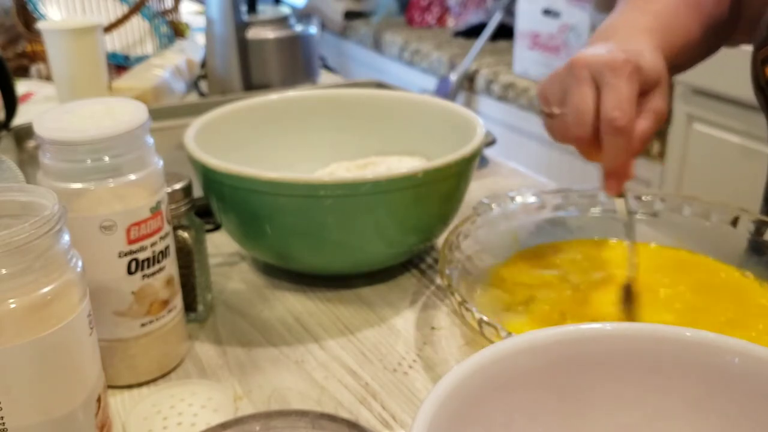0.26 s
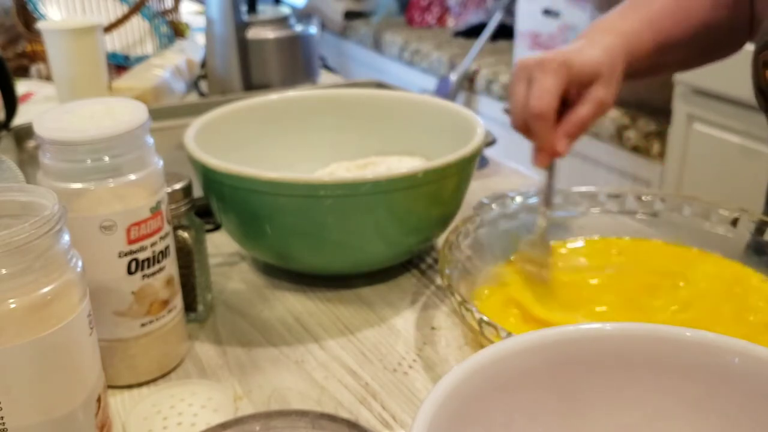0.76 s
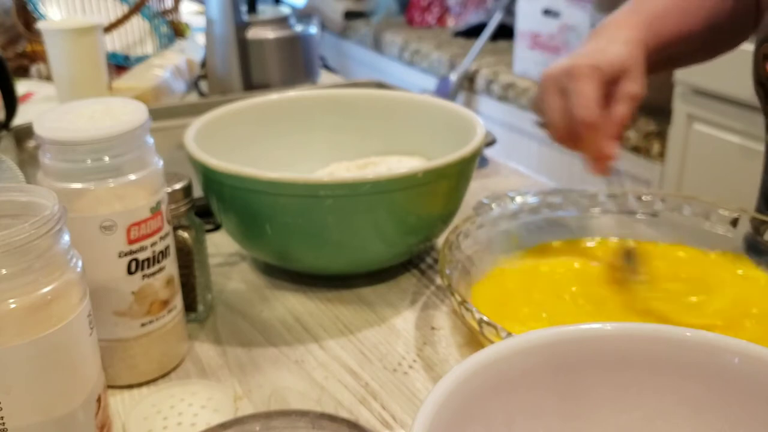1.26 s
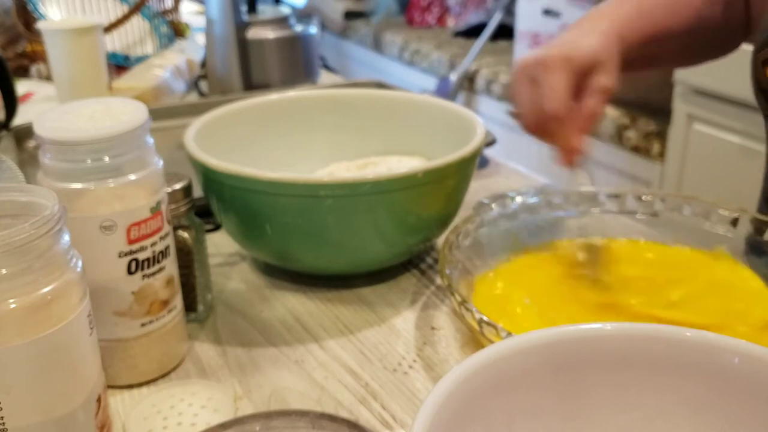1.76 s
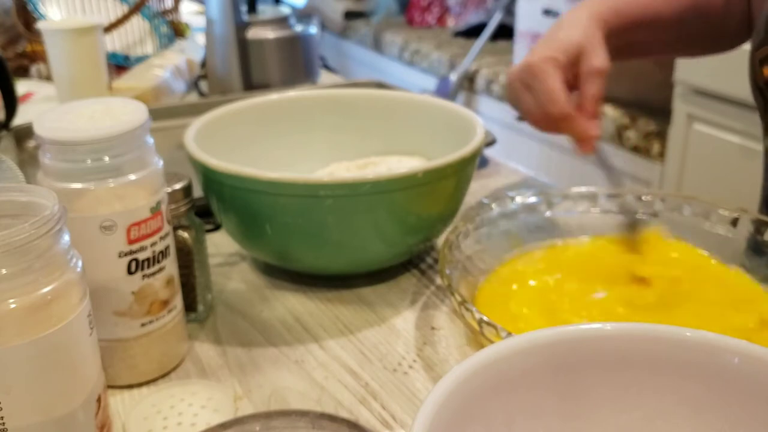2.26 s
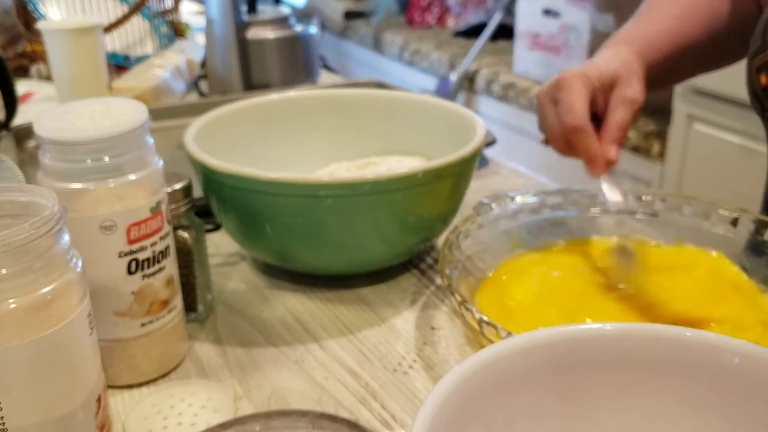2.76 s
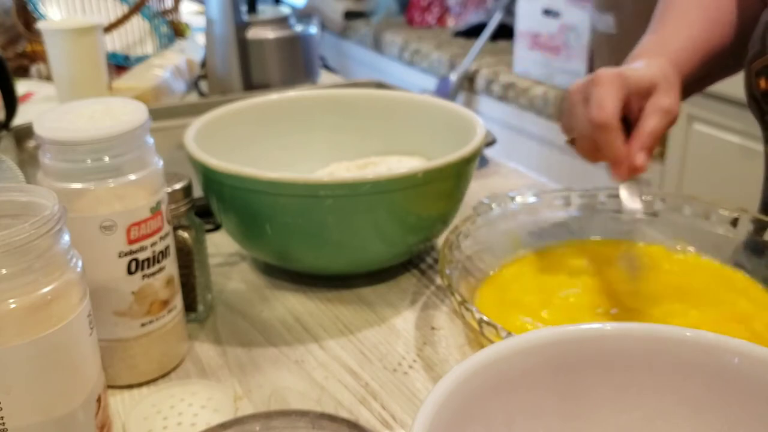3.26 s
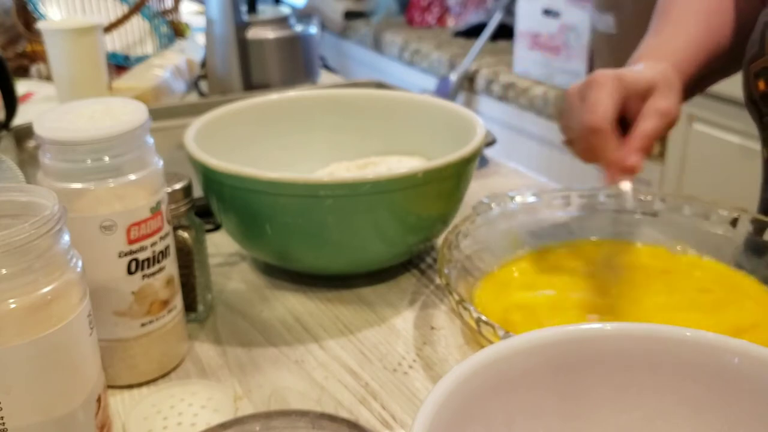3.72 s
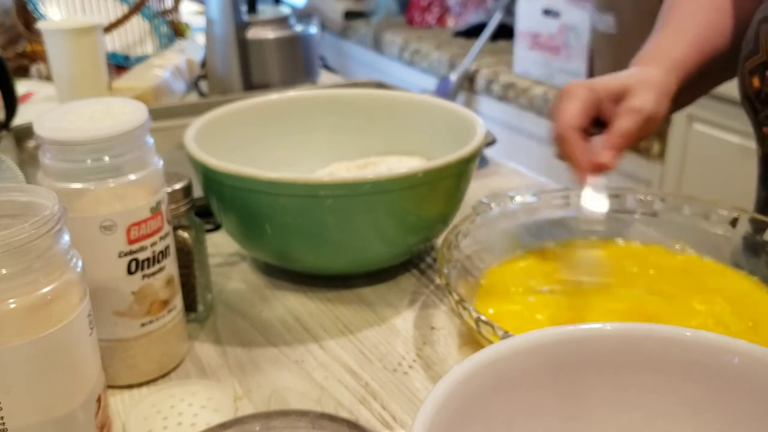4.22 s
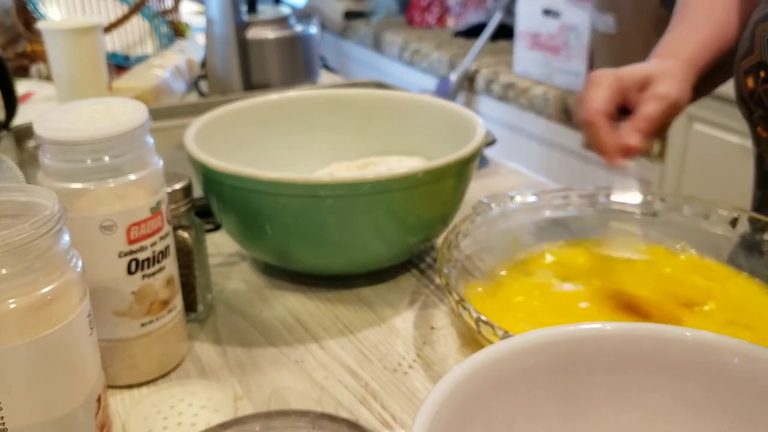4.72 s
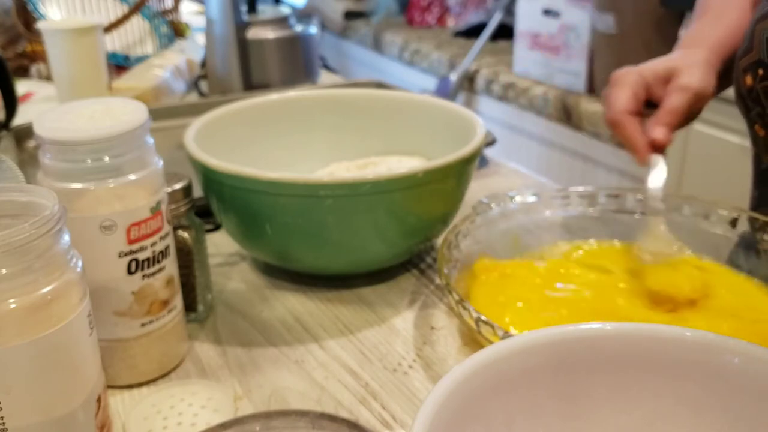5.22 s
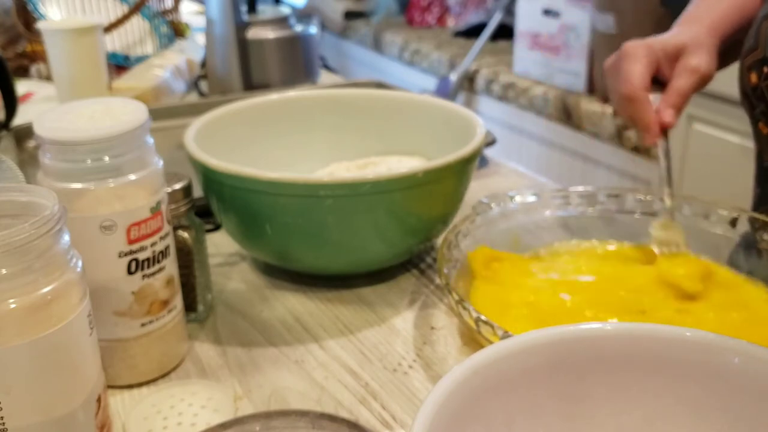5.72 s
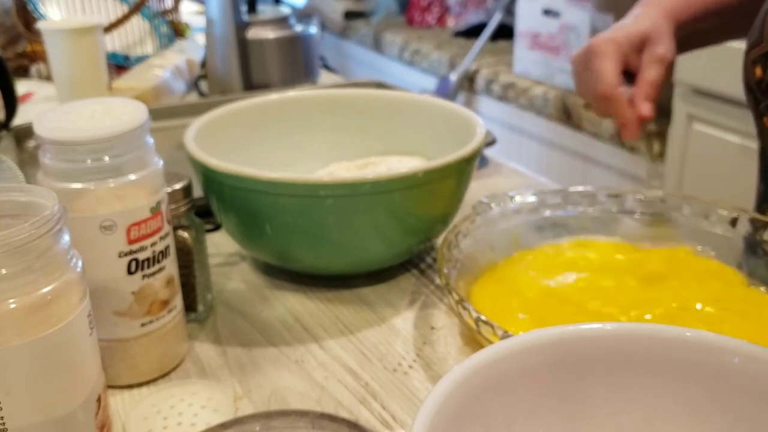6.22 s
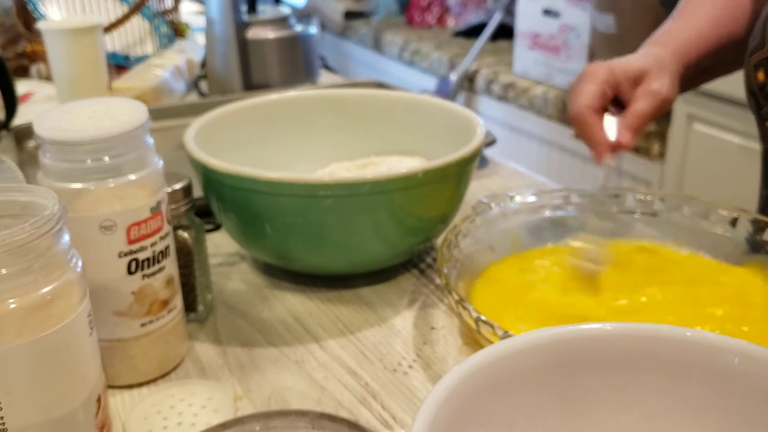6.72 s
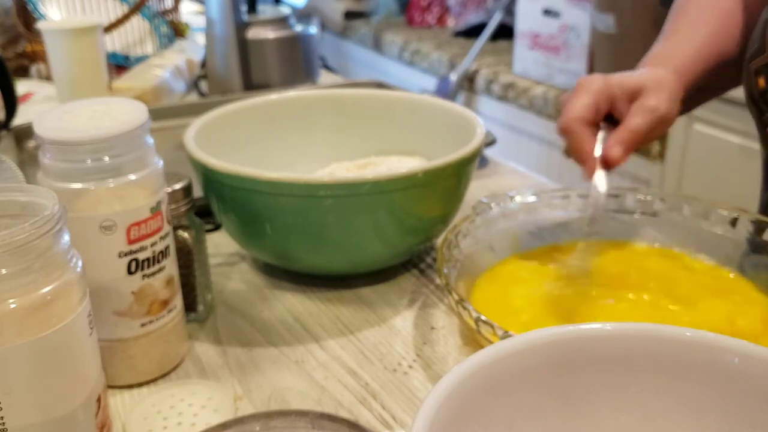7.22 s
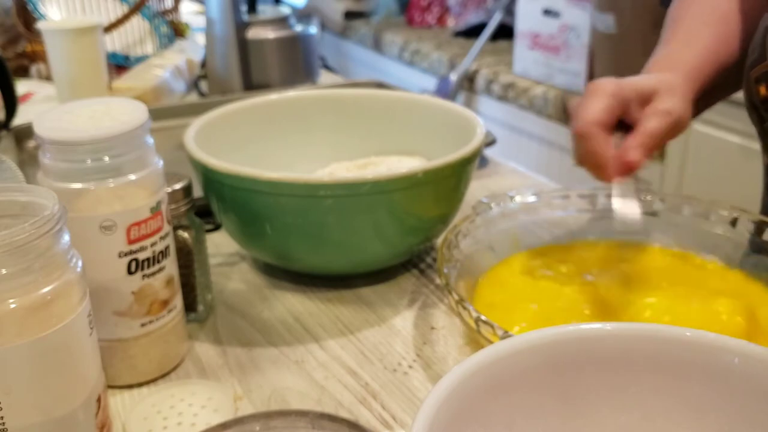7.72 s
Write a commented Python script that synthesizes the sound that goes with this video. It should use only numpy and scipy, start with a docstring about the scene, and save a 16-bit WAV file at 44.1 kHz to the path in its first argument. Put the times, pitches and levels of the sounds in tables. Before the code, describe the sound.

A metal fork whisks eggs in a glass dish, clicking quickly with wet squelches and a few ringing clinks.

```python
"""A steel fork whisks eggs and water in a glass pie dish, about six strokes a second.
Each stroke skids over the wet bottom, clicks, and thumps the dish on the counter.
Four times the fork strikes the bare wall and the glass rings; light grazes only tick.
The moving egg squelches and trapped air plops. A small kitchen reverberates and murmurs."""
import sys
import numpy as np
from scipy import signal
from scipy.fft import rfft, irfft, next_fast_len
from scipy.io import wavfile
from scipy.ndimage import map_coordinates

SR = 44100
rng = np.random.default_rng(int(sys.argv[2]) if len(sys.argv) > 2 else 0)


def store_wav(level_fs):
    """Save 16-bit WAV to argv[1]."""
    pcm = np.round(np.clip(np.atleast_2d(level_fs), -1, 1) * 32767)
    wavfile.write(sys.argv[1], SR, pcm.T.astype(np.int16))


N = 351918
T = np.arange(SR // 2) / SR  # event time/s

# dish and fork damped by egg: f/Hz, width/Hz, gain/dB
DISH_MODES = [(670, 940, -10), (1219, 84, 6.5), (2079, 38, 13), (2760, 930, -0.5)]
# lightly damped wall: f/Hz, width/Hz, gain/dB
WALL_MODES = [(1210, 16, -3), (2078, 16, 0), (3040, 40, -13)]
# fork: f/Hz, width/Hz, gain/dB
FORK_MODES = [(3405, 380, 4), (4713, 600, 4.5), (6260, 1550, 1.5), (7000, 370, 9), (7600, 1900, -2.5)]
# tines: f/Hz, width/Hz, gain/dB
TINE_MODES = [(10750, 1900, 0.5), (12170, 440, 8.3), (14070, 650, 1.5)]
# fork on wet bottom: t/s, relative level/dB, place (0 flat bottom, 1 foot of wall)
STROKE_HITS = [(0.4258, -23.5, 0.17), (0.7921, -22.5, 0.54), (2.0114, -24, 0.74), (2.2207, -24, 0.35),
               (2.4382, -18.5, 0.84), (2.6431, -15.5, 0.34), (2.8209, -17, 1), (2.989, -11.5, 0.79),
               (3.1603, -10.5, 0.6), (3.3237, -9, 0.59), (3.491, -10, .2), (3.6524, -7.5, 0.081),
               (3.8176, -14.5, .3), (3.9874, -12, 0.1), (4.1587, -13.5, 0.74), (4.3336, -22.5, 0.73),
               (4.5121, -25.5, 1), (4.6794, -11.5, 1), (4.8461, -16, 0.82), (5.018, -4, 0.52),
               (5.5438, -19.5, 0.22), (5.712, -19.5, 0.94), (5.8956, -21.5, 0.62), (6.0688, -20, 0.85),
               (6.2564, -18.5, 0.86), (6.4201, -19, .65), (6.605, -21, 0.57), (6.791, -13.5, 0.12),
               (6.9637, -14.5, .05), (7.1343, -13.5, .15), (7.313, -17, 0.89), (7.4832, -10.5, 0.73),
               (7.66, -8, 1), (7.83, -7, 0.75)]


def strokes():
    """Each stroke clicks through dish, fork and tines, throws up egg and thumps the counter."""
    out = np.zeros((2, N))
    lead_s, usual_db = .03, -16.5
    wall_clack_hz, bottom_clack_hz = 2054, 3310
    since = T - lead_s
    for s, db, place in STROKE_HITS:
        chatter_t60_s = at_pace(s, stirring=.027, whisking=.022)
        force = contact(lead_s, chatter_t60_s)
        dish = resonate(force, DISH_MODES) + amp(-5) * resonate(force, WALL_MODES)
        dish *= amp(-10.5 + 6.5 * place)
        detune = 1 + .051 * rng.normal()
        clack = amp(-8) * place * resonate(force, [(wall_clack_hz * detune, 300, 0)])
        clack += amp(-10.5) * (1 - place) * resonate(force, [(bottom_clack_hz * detune, 330, 0)])
        fork = amp(-7) * resonate(force, regripped(FORK_MODES))
        tines = amp(-6) * resonate(force, TINE_MODES)
        slurp = amp(-20.5) * fade(abs(since), .047)
        spatter = amp(-25.5) * fade(abs(since), .26)
        splash = wet(len(T)) * np.where(since < 0, slurp, spatter)
        stroke = stereo(fork + dish + clack + tines + splash, width=.9)
        add(out, s - lead_s, amp(db - 7.5) * kitchen(stroke, near_db=-11.5, room_db=-11))
        excess_db = db - usual_db
        rocking = thump(tilt_db_oct=2.5 + .58 * excess_db)
        bass = kitchen(np.tile(rocking, (2, 1)), near_db=-5, room_db=-12.5)
        bass = (bass + bass.mean(axis=0)) / 2  # nearly mono
        add(out, s, amp(-44.5 + .6 * excess_db) * bass)
    return out


def contact(lead_s, chatter_t60_s):
    """Tine force: a swelling skid for lead_s, a quick bite, then decaying chatter."""
    t = T - lead_s
    skid = amp(-21) * fade(abs(t), .02)
    bite = .5 * fade(abs(t), .0062)
    force = np.where(t < 0, skid + bite, fade(abs(t), chatter_t60_s))
    grit = gritty((2, len(T)), spread_db=1.5) * force
    return grit * np.linalg.norm(force) / np.linalg.norm(grit, axis=1, keepdims=True)


def regripped(modes):
    """Grip and depth in the egg shift the fork's modes from stroke to stroke."""
    return [(hz * (1 + .015 * rng.normal()), .75 * width_hz, db + 2.5 * rng.normal())
            for hz, width_hz, db in modes]


def at_pace(s, stirring, whisking):
    """Value at time s as the hand speeds up from stirring to whisking."""
    return np.interp(s, (.91, 2.6), (stirring, whisking))


# loaded dish on counter: f/Hz
ROCKING_HZ = [87, 140, 208, 266, 335, 415]
# same modes: relative level/dB, t60/s
ROCKING_MODES = [(-13, 0.45), (-10, 0.16), (7.5, 0.082), (10, 0.049), (2, 0.044), (-7.5, 0.14)]


def thump(tilt_db_oct):
    """The dish rocks on the counter; a sharper blow tilts the level towards the upper modes."""
    ring = 0
    for hz, (db, t60_s) in zip(ROCKING_HZ, ROCKING_MODES):
        level_db = db + rng.normal() + tilt_db_oct * np.log2(hz / ROCKING_HZ[2])
        pitch_hz = hz * (1 + .012 * rng.normal())
        ring += amp(level_db) * fade(T, t60_s) * np.sin(2 * np.pi * pitch_hz * T)
    return ring * (1 - np.exp(-T / .0016))


# dish and fork in contact: f/Hz, width/Hz, gain/dB
CONTACT_MODES = [(580, 560, -2), (2380, 510, 1.5), (3090, 420, 3), (4090, 340, -1), (5250, 360, 1),
                 (6880, 390, 3.5)]
# fork on bare wall: t/s, ring/dB, place (0-1), crack/dB, jolt/dB, hold/s; levels relative
WALL_HITS = [(2.3035, -14, 0.32, -17.5, -40, 0.0037), (2.5082, -17, 0.24, -18.5, -56, 0.0016),
             (5.1916, -21.5, 0.01, -16, -27.5, 0.00085), (5.3546, -15.5, 0.66, -22.5, -36.5, 0.021)]


def clinks():
    """The fork skids up to the bare wall and cracks on it; the glass rings, the dish shudders."""
    out = np.zeros((2, N))
    shudder_hz_db = [(25, -9), (60, 7.5), (87, 16), (130, 16.5), (300, -13), (600, 11.5), (2000, -17)]
    for s, db, place, crack_db, jolt_db, hold_s in WALL_HITS:
        free_s = np.maximum(T - hold_s, 0)  # time since the fork let go
        ring = glass_ring(db, place, free_s)
        chatter = rng.standard_normal((2, len(T))) * fade(free_s, .057)
        snap = rng.standard_normal((2, len(T))) * fade(T, .021)
        crack = amp(7.5) * resonate(chatter, CONTACT_MODES) + amp(2) * resonate(chatter, TINE_MODES)
        crack = stereo(crack + amp(1.5) * snap, width=.72)
        blow = (ring + amp(crack_db - 9.5) * crack) * (1 - np.exp(-T / .0001))
        add(out, s, kitchen(blow, near_db=-8.5, room_db=-11.5))
        scrape = rng.standard_normal((2, len(T))) * fade(T, .06)
        skid = resonate(scrape, FORK_MODES)[:, ::-1]  # swells into the blow
        add(out, s - len(T) / SR, amp(-42.5) * stereo(skid, width=.37))
        shudder = shaped(rng.standard_normal(len(T)) * fade(T, .51), shudder_hz_db)
        add(out, s, amp(jolt_db) * shudder + amp(-42) * thump(tilt_db_oct=5.5))
    return out


# glass dish, some modes in close pairs: f/Hz
RING_HZ = [624, 1250, 1318, 2079, 3010, 3080, 4110, 4260, 5352, 5631, 6775, 12170]
# same modes: gain at place 0/dB, gain at place 1/dB, t60/s, L-R/dB
RING_MODES = [(-8.5, -27.5, 0.13, 0.5), (-14, -26.5, 0.063, -21), (-21.5, -17, 0.14, 16.5),
              (-2, -2, 0.16, -1), (4, -24.5, 0.09, -1), (-33, 5.5, 0.054, -16), (-10.5, 0.5, 0.039, 2.5),
              (7.5, -30, 0.11, -1.5), (-15.5, -13.5, 0.1, 25), (-9.5, -20, 0.03, -23), (2.5, -9, 0.031, 8),
              (-30, -8, 0.051, 10.5)]


def glass_ring(db, place, free_s):
    """The place struck weights the modes; the dry rim sings on after the egg damps the rest."""
    ring = np.zeros((2, len(T)))
    for hz, (db0, db1, t60_s, pan_db) in zip(RING_HZ, RING_MODES):
        phase = rng.uniform(0, 2 * np.pi) + np.array([[0], [1.4]])
        slosh = .25 * wander(len(T), order=3)
        level_db = db + db0 + place * (db1 - db0) + pan_db * np.array([[.5], [-.5]])
        rim = amp(-22) * fade(T, .6) / np.hypot(1, (hz / 6500) ** 2) * hz / (hz + 1500)
        envelope = amp(level_db) * (fade(free_s, t60_s) + rim)
        ring += envelope * np.sin(2 * np.pi * hz * T + phase + slosh)
    return ring


# light tine contacts: t/s, relative level/dB
GRAZE_HITS = [(0.569, -27.5), (0.632, -38), (0.853, -29.5), (1.3166, -30.5), (1.788, -30.5),
              (1.8465, -33.5), (2.0033, -27), (3.5616, -24), (4.3008, -28.5)]


def grazes():
    """A tine just ticks the glass."""
    out = np.zeros((2, N))
    for s, db in GRAZE_HITS:
        force = fade(T, .017) * gritty((2, len(T)), spread_db=3)
        tick = resonate(force, FORK_MODES) + amp(-3.5) * resonate(force, TINE_MODES)
        tick += amp(-7) * resonate(force, WALL_MODES)
        add(out, s, amp(db - 14.5) * kitchen(stereo(tick, width=1), near_db=-3, room_db=-5))
    return out


# egg in motion: t/s, level/dB
CHURN_CURVE = [(0, -57), (.4, -85), (.8, -62.5), (1.3, -68.5), (2.2, -65), (2.8, -67), (4.4, -65.5),
               (5.9, -79.5), (6.7, -67.5), (7.98, -72)]
# slow fork drags: peak t/s, relative level/dB
DRAGS = [(0.0, -44.5), (0.558, -47), (0.908, -44.5), (1.147, -47.5), (1.399, -47), (1.66, -46.5),
         (1.878, -38), (2.07, -44.5), (4.342, -44)]


def squelch():
    """Moving egg squelches; each drag of the fork adds to it and excites the wall."""
    t = np.arange(N) / SR
    drag = np.zeros(N)
    for s, db in DRAGS:
        half_width_s = at_pace(s, stirring=.051, whisking=.028)
        drag += amp(db - 12.5) * np.exp(-((t - s) / half_width_s) ** 2)
    churn = amp(np.interp(t, *np.transpose(CHURN_CURVE)))
    egg = (churn + drag) * wet(N)
    glass = amp(-6) * drag * resonate(rng.standard_normal((2, N)), WALL_MODES)
    return kitchen(stereo(egg + glass, width=1), near_db=-11.5, room_db=-11)[:, :N]


# wet egg: f/Hz, relative level/dB
EGG_SPECTRUM = [(300, -27), (600, -3), (1100, -6), (1600, -5), (2100, 1.5), (3200, 1), (4600, 1.5),
                (6300, 5.5), (8800, -11.5), (12000, -2.5), (16000, -8.5)]


def wet(size):
    """Tearing films crackle and small bubbles pop: mid and side, rms 1."""
    clumps = amp(4 * wander(size, order=1))
    crackle = unit(gritty(size, spread_db=6) * clumps)
    pops = np.zeros(size)
    for when, pitch, strength in rng.random((size // 150, 3)):
        pop = plop(900 * 10 ** pitch, t60_cycles=24, rise=8)
        add(pops, when * size / SR, amp(20 * strength + 10 * pitch) * pop)
    mid = crackle + .6 * unit(pops)
    side = unit(gritty(size, spread_db=6) * clumps)
    return unit(shaped(np.array([mid, side]), EGG_SPECTRUM))


# large air pockets in the egg: t/s, level/dB, f/Hz
LARGE_POCKETS = [(1.402, -46, 1145), (1.628, -43.5, 1010), (2.719, -38, 550), (2.803, -42, 793),
                 (3.805, -36.5, 1310), (4.015, -38.5, 890), (4.102, -36.5, 835), (4.313, -39, 805),
                 (4.368, -39, 935), (4.457, -41.5, 1154), (4.495, -37.5, 780), (4.598, -42.5, 1310),
                 (4.833, -38.5, 687), (5.612, -39.5, 970), (6.264, -36.5, 803), (6.598, -37, 1434)]


def bubbles():
    """An air pocket tears open with a smack and plops."""
    out = np.zeros((2, N))
    for s, db, hz in LARGE_POCKETS + small_pockets():
        ring = plop(hz, t60_cycles=36, rise=1.65)
        tear = gritty(len(ring), spread_db=1) * fade(T[:len(ring)], .077)
        smack = resonate(tear, [(hz, hz / 2, 0), (1.9 * hz, hz, -9)])
        bubble = np.pad(ring + amp(-8.5) * smack, (0, len(T)))
        add(out, s, amp(db) * kitchen(np.tile(bubble, (2, 1)), near_db=-8, room_db=-13))
    return out


def small_pockets(whisking_from_s=2.6, share=.55, lead_s=.012):
    """Some whisking strokes trap air as the fork dives in: t/s, level/dB, f/Hz."""
    chances = rng.random(len(STROKE_HITS))
    scatter = rng.standard_normal((len(STROKE_HITS), 3))
    return [(s - lead_s + .017 * late, -44.5 + 2 * loud, 912 * 2 ** (.513 * high))
            for (s, _, _), chance, (late, loud, high) in zip(STROKE_HITS, chances, scatter)
            if s > whisking_from_s and chance < share]


def plop(hz, t60_cycles, rise):
    """An air pocket rings, rising in pitch as it nears the surface."""
    t = T[:SR // 20]
    envelope = fade(t, t60_cycles / hz) * (1 - np.exp(-t / .0018))
    return envelope * np.sin(2 * np.pi * hz * (t + rise * t * t))


# room decay: f/Hz, t60/s
ROOM_DECAY = [(80, 0.79), (250, 0.2), (600, 0.62), (2000, 0.61), (6000, 0.64), (10000, 0.4), (16000, 0.18)]
# room tail: f/Hz, relative level/dB
ROOM_SPECTRUM = [(80, -11), (250, 2.5), (600, 3.5), (2000, -3), (6000, -8), (12000, -4.5)]


def kitchen(sound, near_db, room_db):
    """Direct sound, scatter off nearby bowls and room tail, new for each fork position."""
    hz, t, bins = signal.stft(rng.standard_normal((2, len(T))), SR, nperseg=256)
    bins = bins * fade(t, along(ROOM_DECAY, hz)[:, None]) * amp(along(ROOM_SPECTRUM, hz))[:, None]
    tail = signal.istft(bins, SR, nperseg=256)[1][:, :len(T)]
    near = filtered(rng.standard_normal((2, len(T))), lambda f: 1 / np.hypot(1, f / 7000))
    near *= fade(T, .045)
    arrival = np.clip((T - .005) / .005, 0, 1)
    response = amp(near_db) * unit(near * arrival) + amp(room_db) * unit(tail * arrival)
    response /= np.sqrt(len(T))
    response[:, 0] += 1  # direct path
    return signal.fftconvolve(sound, response, axes=1)


# kitchen background: f/Hz, relative level/dB
MURMUR_SPECTRUM = [(25, -8), (50, -9), (80, 2), (170, 2.5), (260, -9.5), (380, -4.5), (600, -37.5),
                   (1200, -45.5), (3000, -30), (8000, -29), (16000, -32)]


def murmur():
    """Low steady noise of air and appliances."""
    air = unit(shaped(rng.standard_normal((2, N)), MURMUR_SPECTRUM))
    return amp(-62) * stereo(air, width=.25)


def amp(db):
    """Decibels to gain."""
    return 10 ** (np.asarray(db) / 20)


def unit(x):
    """Scale to rms 1."""
    return x / np.sqrt(np.mean(np.abs(x) ** 2) + 1e-20)


def fade(t, t60_s):
    """Exponential decay, 60 dB in t60_s."""
    return np.exp(-np.log(1000) * t / t60_s)


def gritty(shape, spread_db):
    """Spiky noise, rms 1: tiny impacts of unequal size."""
    return unit(rng.standard_normal(shape) * amp(spread_db * rng.standard_normal(shape)))


def wander(size, order):
    """Random spline, one knot per 256 samples."""
    return map_coordinates(rng.standard_normal(size // 256 + 4), [np.arange(size) / 256], order=order)


def along(points, hz):
    """Interpolate (f/Hz, value) points on a log axis."""
    f, values = np.transpose(points)
    return np.interp(np.log(hz + 1), np.log(f + 1), values)


def filtered(x, response):
    """Apply a complex frequency response."""
    n = x.shape[-1]
    padded = next_fast_len(n + 4096)
    return irfft(rfft(x, padded) * response(np.fft.rfftfreq(padded, 1 / SR)), padded)[..., :n]


def shaped(x, spectrum):
    """Apply an (f/Hz, gain/dB) curve."""
    return filtered(x, lambda f: amp(along(spectrum, f)))


def resonate(x, modes):
    """Apply (f/Hz, width/Hz, gain/dB) resonances, overall power gain 1."""
    return filtered(x, lambda f: unit(sum(
        (-1) ** k * amp(db) * 1j * f * width / (hz * hz - f * f + 1j * f * width)
        for k, (hz, width, db) in enumerate(modes))))


def stereo(sound, width, lag_s=.00011):
    """Mid and side to left and right: long waves reach both alike, the right first."""
    mid = sound[0]
    side = width * filtered(sound[1], lambda f: 1j * f / (700 + 1j * f))
    pair = np.array([mid + side, mid - side])
    return filtered(pair, lambda f: np.exp(1j * np.pi * f * lag_s * np.array([[-1], [1]])))


def add(track, s, sound):
    """Mix sound into track from time s."""
    part = track[..., max(round(s * SR), 0):][..., :sound.shape[-1]]
    part += sound[..., :part.shape[-1]]


def scene():
    """Whisking slightly to the right, with clinks, bubbles and the kitchen's murmur."""
    whisking = (strokes() + grazes() + squelch()) * amp([[-.7], [.7]])
    return whisking + clinks() + bubbles() + murmur()


def record(dry):
    """Low cut, soft peak limit, steep high cut."""
    low_hz, ceiling, top_hz = 28, .9, 16200
    thinned = filtered(dry, lambda f: (1j * f / (low_hz + 1j * f)) ** 2)
    rounded = thinned / (1 + np.abs(thinned / ceiling) ** 4) ** (1 / 4)
    return filtered(rounded, lambda f: 1 / np.hypot(1, (f / top_hz) ** 70))


dry = scene()
out = record(dry)
store_wav(out)
```